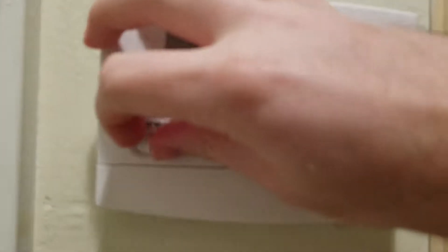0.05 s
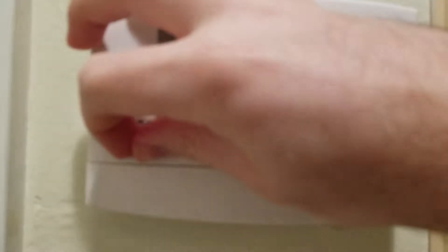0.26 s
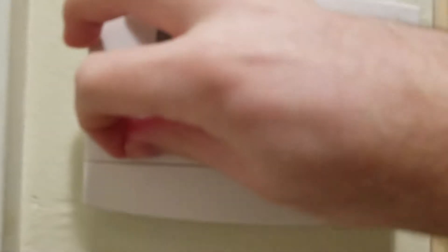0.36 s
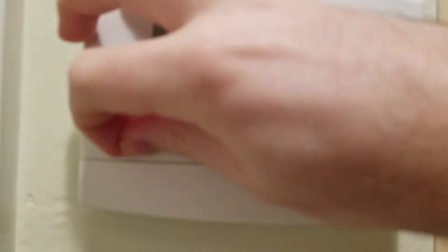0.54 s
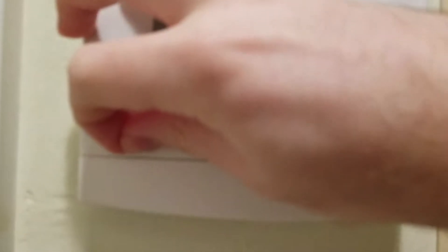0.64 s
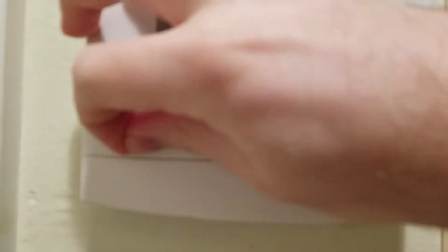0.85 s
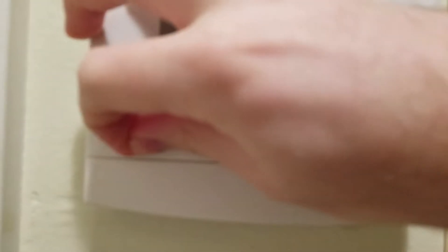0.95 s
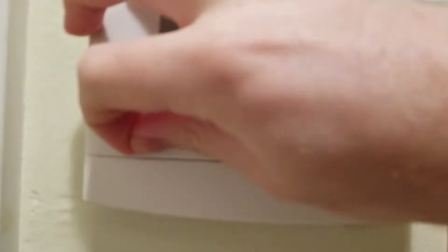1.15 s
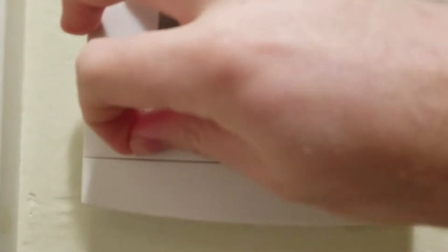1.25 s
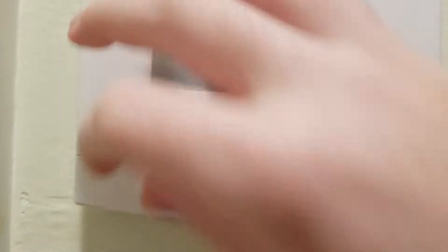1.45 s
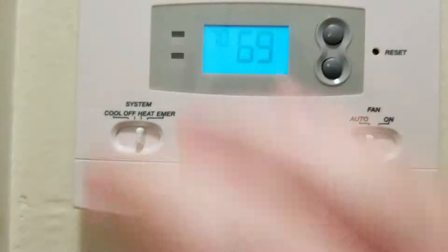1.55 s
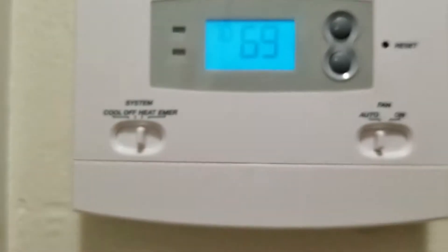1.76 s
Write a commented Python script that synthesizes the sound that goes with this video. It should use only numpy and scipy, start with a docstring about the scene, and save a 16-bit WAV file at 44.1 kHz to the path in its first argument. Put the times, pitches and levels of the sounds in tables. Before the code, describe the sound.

Small hollow clicks of a thermostat switch being slid, with fingers rubbing the plastic.

```python
"""Thermostat slide switch

Fingers work the slider of a plastic wall thermostat, close by in a small quiet room with a faint hum.
Each catch knocks the hollow casing and sets its cover ringing; one detent snaps brightly.
Small springs ring on, skin rubs the plastic, and the hand bumps the casing as it works and lets go."""
import sys
import numpy as np
from scipy import signal
from scipy.io import wavfile

SR = 44100
rng = np.random.default_rng(int(sys.argv[2]) if len(sys.argv) > 2 else 0)


def wrap_up_sound(samples):
    """Save the sound to the file named by the first command line argument, as 16-bit audio."""
    columns = np.atleast_2d(samples).T
    # keep every value between -1 and 1, then stretch to whole-number steps
    tamed = np.clip(columns, -1, 1)
    steps = np.round(tamed * 32767).astype(np.int16)
    wavfile.write(sys.argv[1], SR, steps)


N = 79380
T = np.arange(N) / SR

# stereo balance: f/Hz, left-right/dB
BALANCE = [(250, 0.5), (500, 3), (900, 3), (1400, 2.5), (2000, 15), (3000, 9), (4200, 8.5), (5500, 1.5),
           (8000, -2.5), (11000, -1.5), (13500, -5), (15500, 6)]


def from_db(db):
    """Decibels to gain."""
    return 10 ** (np.asarray(db) / 20)


def unit_rms(x):
    """Scale to rms 1."""
    return x / np.sqrt(np.mean(x ** 2) + 1e-20)


def at_hz(points, hz):
    """Interpolate a table over log frequency."""
    freqs_hz, values = np.transpose(points)
    return np.interp(np.log(hz), np.log(freqs_hz), values)


def pan(left_right_db):
    """Constant-power stereo gains."""
    return unit_rms(from_db([[left_right_db / 2], [-left_right_db / 2]]))


def impulses(times_s, levels_db):
    """Impulse train."""
    out = np.zeros(N)
    out[np.clip((times_s * SR).astype(int), 0, N - 1)] = from_db(levels_db)
    return out


def resonator(drive, hz, t60_s):
    """One mode: a unit impulse starts a decaying sine of height 1."""
    radius, angle = from_db(-60 / (t60_s * SR)), 2 * np.pi * hz / SR
    return signal.lfilter([0, np.sin(angle)], [1, -2 * radius * np.cos(angle), radius ** 2], drive + 1e-18)


def noise_bands(size):
    """Yield (centre in Hz, stereo noise) per third octave; the sides are alike in the bass."""
    # f/Hz, left-right correlation
    correlation = [(100, .92), (380, .88), (650, .55), (1400, 0), (15000, 0)]
    edges_hz = 22 * 2 ** (np.arange(30) / 3)
    white = rng.standard_normal((2, 2, size + 4000))  # extra samples let the filters settle
    for k, (low_hz, high_hz) in enumerate(zip(edges_hz, edges_hz[1:])):
        bandpass = signal.butter(2, [low_hz, high_hz], "band", fs=SR, output="sos")
        mid, side = signal.sosfilt(bandpass, white[k % 2])[:, -size:]
        hz = np.sqrt(low_hz * high_hz)
        alike = at_hz(correlation, hz)
        stereo = np.sqrt(1 + alike) * mid + np.sqrt(1 - alike) * np.array([side, -side])
        yield hz, stereo * pan(at_hz(BALANCE, hz))


def coloured_noise(spectrum):
    """Steady stereo noise, rms 1."""
    return unit_rms(sum(from_db(at_hz(spectrum, hz)) * band for hz, band in noise_bands(N)))


def room_air(level_db=-66.5):
    """Steady air noise, mostly rumble."""
    # f/Hz, relative density/dB
    spectrum = [(25, -10), (45, 2.5), (70, 2.5), (95, -7.5), (160, -3), (230, -3), (330, -4), (420, -38.5),
                (650, -17.5), (1100, -19.5), (2000, -19), (4400, -20.5), (6500, -31), (16000, -26.5)]
    return from_db(level_db) * coloured_noise(spectrum)


def hum(waver_depth=0.37):
    """Low tones wavering in level and phase."""
    # f/Hz, level/dB
    tones = [(65, -75), (120, -73), (155, -74), (217, -74)]
    out = np.zeros(N)
    for hz, db in tones:
        knots = rng.standard_normal((32, 2)) @ [1, 1j]
        waver = 1 + waver_depth * np.interp(T, np.linspace(0, T[-1], len(knots)), knots)
        carrier = np.exp(2j * np.pi * (hz * T + rng.random()))
        out += from_db(db) * np.real(waver * carrier)
    return out


def rubbing():
    """Friction noise of skin dragging on plastic."""
    # t/s, level/dB
    envelope = [(0, -63), (.1, -62.5), (.3, -61.5), (.7, -63), (.82, -67), (1.13, -66.5), (1.17, -54),
                (1.26, -62), (1.33, -49), (1.41, -58.5), (1.48, -70.5), (1.8, -76)]
    # f/Hz, relative density/dB
    spectrum = [(100, -16), (250, -5), (430, 1.5), (620, -5), (850, -2.5), (1100, -3.5), (1500, -4.5),
                (2050, -0.5), (2700, -25), (3400, -42), (6000, -32), (15000, -38)]
    return from_db(np.interp(T, *np.transpose(envelope))) * coloured_noise(spectrum)


def catch_force(hz):
    """Drive at one frequency: an impulse for each catch of the slider."""
    # t/s, knock/dB, cover ring/dB, tick/dB, snap/dB
    catches = [(0.0332, -55, -47.5, -65.5, -90), (0.075, -64.5, -59.5, -68, -94),
               (0.148, -54, -60, -51.5, -75.5), (0.215, -68, -55, -46.5, -71.5),
               (0.2175, -46.5, -38.5, -45.5, -63.5), (0.262, -56, -53.5, -82, -79),
               (0.3013, -54.5, -49, -65, -91), (0.3534, -41, -41, -44.5, -56.5),
               (0.4335, -34, -39.5, -39.5, -62), (0.4603, -37.5, -33.5, -53.5, -64),
               (0.4635, -51, -42, -46, -68), (0.4912, -49.5, -51, -68, -86), (0.536, -34, -35, -48, -52.5),
               (0.538, -72, -44.5, -36.5, -70), (0.5454, -64, -29, -74, -85),
               (0.6277, -49, -33, -47, -59.5), (0.679, -56, -43, -52.5, -81), (0.735, -54, -48, -69, -88),
               (0.875, -69.5, -57.5, -60.5, -60.5), (0.9961, -48.5, -33.5, -46, -39.5),
               (1.1519, -54, -49, -76, -85), (1.19, -51.5, -63.5, -97, -91), (1.201, -54.5, -78, -91, -92),
               (1.2315, -51.5, -51.5, -71, -91), (1.241, -61, -52.5, -68, -96),
               (1.2763, -42, -45.5, -47.5, -77), (1.2875, -35, -42.5, -49, -72),
               (1.302, -39.5, -36.5, -46.5, -53), (1.316, -41, -50, -59, -67),
               (1.327, -61, -50, -47.5, -73), (1.354, -38, -40.5, -41, -60), (1.3577, -75, -39, -46.5, -88),
               (1.381, -51.5, -52, -58, -75), (1.5365, -97, -85, -64.5, -77.5)]
    # centres of knock, cover ring, tick and snap: f/Hz
    centres_hz = [1086, 2067, 2750, 8100]
    bass_below_hz, bass_pivot_db, bass_slope = 600, -40, 0.42
    times_s = np.array([row[0] for row in catches])
    db = np.array([np.interp(np.log(hz), np.log(centres_hz), row[1:]) for row in catches])
    if hz < bass_below_hz:  # bass grows more slowly than the knock
        db = bass_pivot_db + bass_slope * (db - bass_pivot_db)
    return impulses(times_s, db)


def dense_ring(spectrum, decay, onset_s):
    """Catches excite many close modes or echoes, dying band by band. decay: f/Hz, t60/s."""
    t = T[T < min(0.5, 2 * max(t60_s for _, t60_s in decay))]
    onset = 1 - np.exp(-(t / onset_s) ** 2)
    out = np.zeros((2, N))
    for hz, band in noise_bands(len(t)):
        if hz > 80:
            tail = band * onset * from_db(-60 * t / at_hz(decay, hz))
            tail *= np.sqrt(4 * hz / np.mean(np.sum(tail ** 2, axis=1)))  # equal energy per Hz
            struck = signal.fftconvolve(catch_force(hz)[None], tail, axes=1)[:, :N]
            out += from_db(at_hz(spectrum, hz)) * struck
    return out


def casing(spread_db=2):
    """The hollow box rings briefly; each catch strikes each mode a little differently."""
    # f/Hz, gain/dB, t60/s, left-right/dB, right lag/ms
    modes = [(264, -11.5, 0.052, 3.5, 0), (376, -4, 0.052, -1, 0.065), (452, -10.5, 0.019, 7, 0.071),
             (750, -1.5, 0.023, 0, 0), (888, 4, 0.014, -2.5, 0.12), (1075.5, 6.5, 0.031, 1.5, 0.091),
             (1370, 6, 0.0085, 2, 0.068), (1663, -2.5, 0.011, 7, 0.28), (1884, 8.5, 0.018, 11, 0.25),
             (2054, 4.5, 0.026, 13.5, 0.62), (2638, -2, 0.044, 6, 0.12), (3225, 5.5, 0.02, 11.5, 0.24),
             (3467, -0.5, 0.037, 34, 0.13), (4200, -7, 0.0053, 0, 0.16), (4784, 3.5, .018, -34, .18),
             (6280, -6, 0.014, -4, 0.23), (8170, 2, 0.013, -17, 0.19), (10900, 6, 0.0069, -30, .18)]
    out = np.zeros((2, N))
    for k, (hz, db, t60_s, pan_db, lag_ms) in enumerate(modes):
        drive = catch_force(hz) * from_db(spread_db * rng.standard_normal(N))
        left = (-1) ** k * from_db(db) * resonator(drive, hz, t60_s)
        right = np.interp(T - lag_ms / 1000, T, left)
        out += pan(pan_db) * np.array([left, right])
    return out


def crack(direct_db=-18, scatter_db=-19.5):
    """Sharp contact and its scatter off hand, wall and microphone body."""
    # f/Hz, relative density/dB
    spectrum = [(150, -7.5), (600, -12), (1200, 0), (2000, -9), (2700, -7.5), (4500, -2), (6100, -14.5),
                (7300, -20), (8200, -8), (9500, -20.5), (11200, -11.5), (15500, -15)]
    direct = dense_ring(spectrum, decay=[(3000, 0.007), (12000, 0.004)], onset_s=0.0003)
    scatter = dense_ring(spectrum, decay=[(1000, 0.045)], onset_s=0.0035)
    return from_db(direct_db) * direct + from_db(scatter_db) * scatter


def room_reverb(gain_db=-21):
    """The small room answers each catch."""
    # f/Hz, relative density/dB
    spectrum = [(90, -48), (160, -1.5), (280, -1), (430, -1), (600, -10), (1080, 2.5), (1500, -8.5),
                (2000, -5), (2600, -5), (3400, 2), (6000, -4), (10000, -7.5), (15500, -13.5)]
    # f/Hz, t60/s
    decay = [(150, 0.38), (400, 0.44), (1000, .27), (2800, 0.33), (7000, 0.29), (15000, 0.24)]
    return from_db(gain_db) * dense_ring(spectrum, decay, onset_s=0.0049)


def casing_echoes(box, gain_db=-11.5, t60_s=0.14, onset_s=0.0049, highpass_hz=620):
    """Diffuse reflections of the casing's ring, above the bass."""
    t = T[:SR // 2]
    onset = 1 - np.exp(-(t / onset_s) ** 2)
    tail = rng.standard_normal((2, len(t))) * onset * from_db(-60 * t / t60_s)
    tail /= np.sqrt(np.sum(tail ** 2, axis=1, keepdims=True))
    tail = signal.sosfilt(signal.butter(2, highpass_hz, "high", fs=SR, output="sos"), tail)
    return from_db(gain_db) * signal.fftconvolve(box, tail, axes=1)[:, :N]


def springs(mode_gap_hz=25):
    """Small switch parts ring on after a catch, in one mode or a close cluster."""
    # t/s, f/Hz, half-width/Hz, level/dB, t60/s
    rings = [(0.036, 3200, 75, -65.5, 1.1), (.148, 3250, 252, -58, 0.56), (0.215, 5910, 396, -60, 0.26),
             (.536, 3200, 102, -77, 0.67), (.536, 2170, 60, -66, 0.78), (.628, 5120, 208, -43, .035),
             (.875, 4600, 597, -62, 0.52), (.996, 2140, 70, -56.5, 0.77), (.996, 6100, 150, -42, 0.15),
             (1.151, 3260, 74, -70, 0.55), (1.303, 12000, 502, -58, .25), (1.353, 4333, 0, -65.5, 1.31)]
    out = np.zeros((2, N))
    for start_s, hz, half_width_hz, db, t60_s in rings:
        start, count = int(start_s * SR), 1 + int(abs(half_width_hz) / mode_gap_hz)
        t = T[:min(N - start, int(t60_s * SR))]
        offsets = 2 * (np.arange(count) + rng.random(count)) / count - 1
        modes_hz = hz + half_width_hz * offsets
        cluster = sum(np.sin(2 * np.pi * (f * t + rng.random((2, 1)))) for f in modes_hz)
        envelope = from_db(db - 60 * t / t60_s) / np.sqrt(count)
        out[:, start:start + len(t)] += pan(at_hz(BALANCE, hz)) * envelope * cluster
    return out


def wall_boom(lowpass_hz=440, catch_share_db=-34):
    """Soft hand bumps on the casing, and the catches, shake the wall."""
    # t/s, level/dB
    bumps = [(0.353, -55.5), (.461, -50), (0.539, -46), (1.288, -49), (1.318, -52), (1.336, -53)]
    # wall and room: f/Hz, gain/dB, t60/s
    modes = [(161.3, -11, .4), (212.7, -6, 0.65), (268, -0.5, 0.26), (362.6, -7, 0.37), (481, -7, 0.5)]
    soften = signal.butter(2, lowpass_hz, fs=SR, output="sos")
    push = signal.sosfilt(soften, impulses(*np.transpose(bumps)))
    out = np.zeros(N)
    for hz, db, t60_s in modes:
        drive = push + from_db(catch_share_db) * catch_force(hz)
        out += from_db(db) * resonator(drive, hz, t60_s)
    return out


def scene():
    """Switch, hand and room, in stereo."""
    box = casing()
    reflections = room_reverb() + casing_echoes(box)
    return box + reflections + crack() + springs() + wall_boom() + rubbing() + room_air() + hum()


def record(dry):
    """Roll off the deepest rumble, cut the top steeply."""
    highpass_hz, lowpass_hz = 23, 16100
    dry = signal.sosfilt(signal.butter(2, highpass_hz, "high", fs=SR, output="sos"), dry)
    return signal.sosfilt(signal.ellip(10, 0.2, 70, lowpass_hz, fs=SR, output="sos"), dry)


dry = scene()
out = record(dry)
wrap_up_sound(out)
```